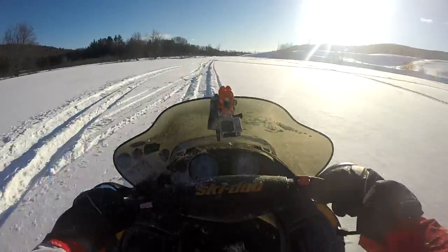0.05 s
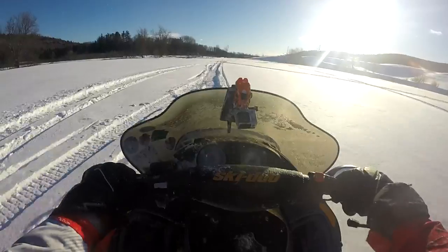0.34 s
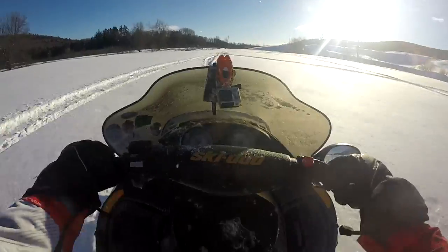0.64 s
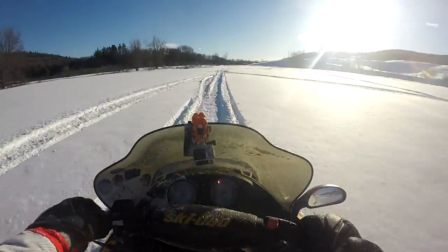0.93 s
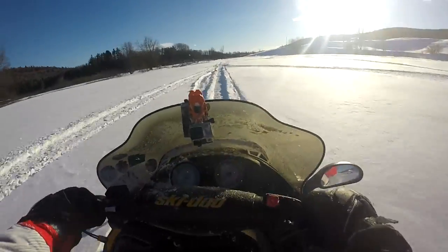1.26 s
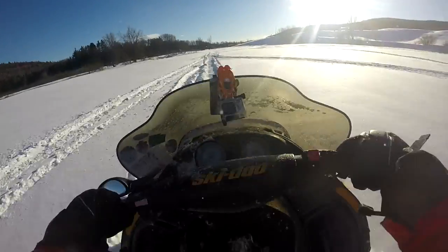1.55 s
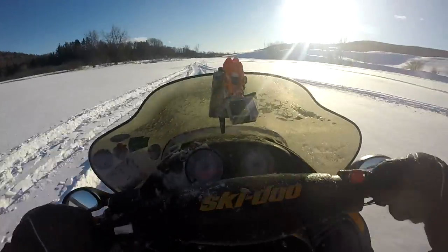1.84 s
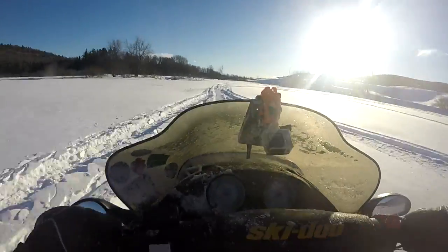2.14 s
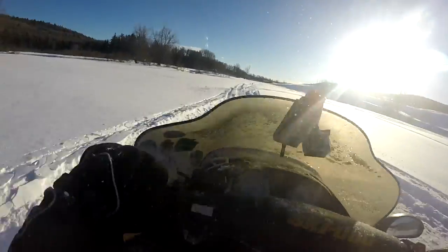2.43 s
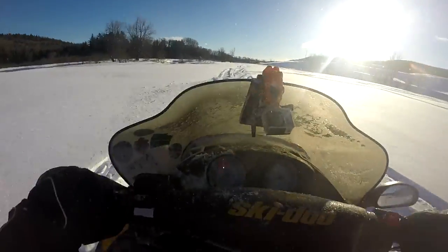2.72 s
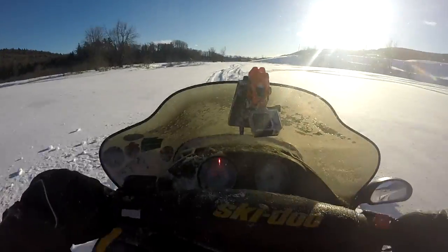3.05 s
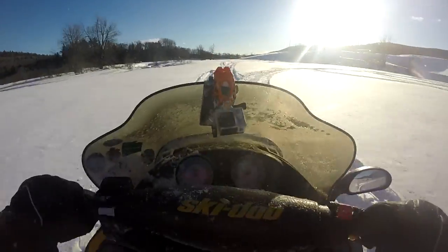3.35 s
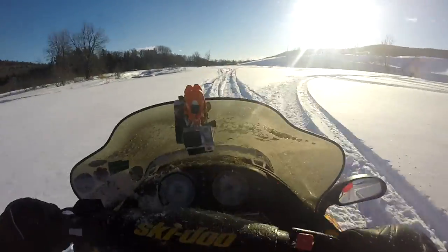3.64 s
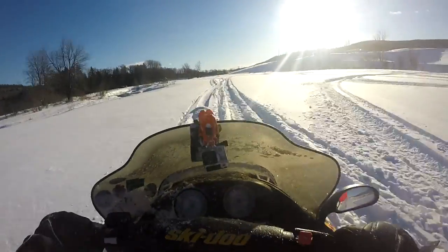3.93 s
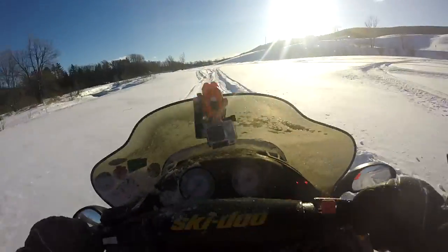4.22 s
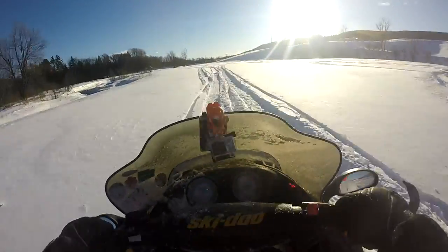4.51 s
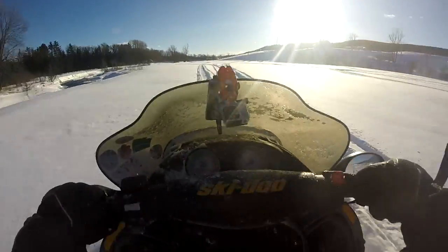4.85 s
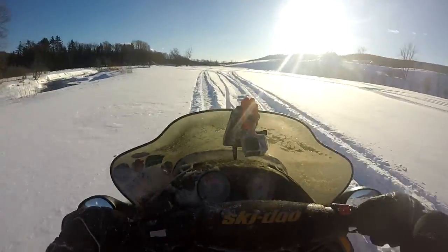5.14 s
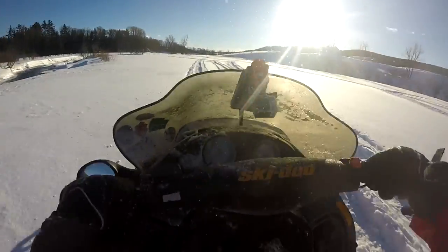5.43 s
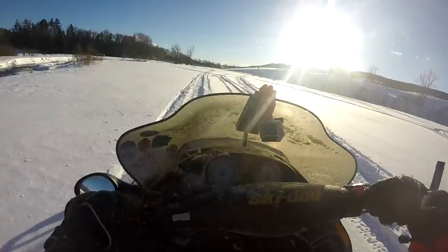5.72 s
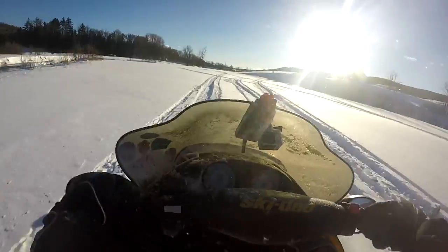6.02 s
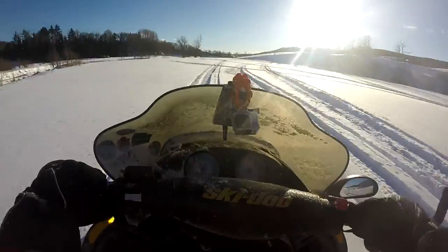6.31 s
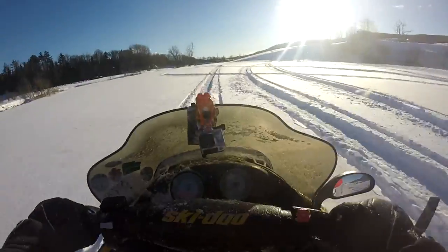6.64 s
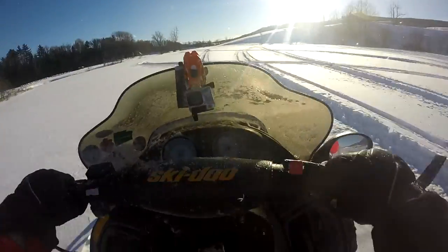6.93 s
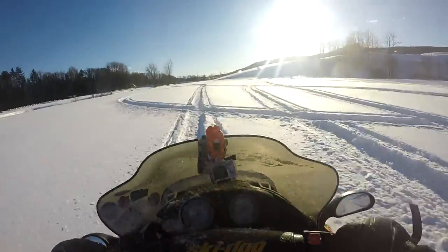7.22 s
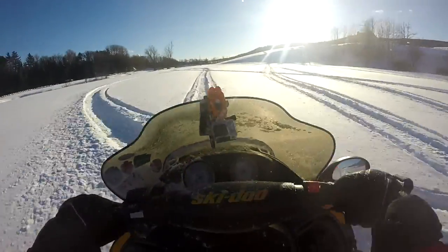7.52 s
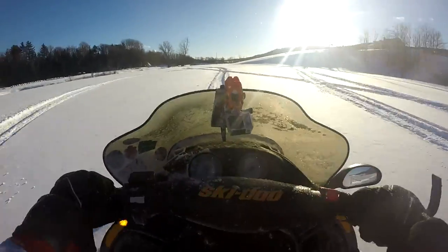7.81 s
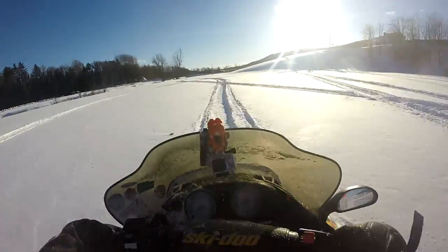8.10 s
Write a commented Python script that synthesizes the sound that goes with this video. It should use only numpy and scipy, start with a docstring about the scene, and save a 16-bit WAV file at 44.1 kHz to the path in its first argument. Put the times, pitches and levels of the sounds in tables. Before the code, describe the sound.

A two-stroke snowmobile runs at speed across open snow, heard close up from a microphone on the rider. Its loud, buzzing drone holds nearly the same pitch throughout, shifting slightly in tone. A lighter drive rattle and a grainy hiss of snow buzz along with it, and faint high whines come and go. Wind rumbles underneath, and after about two seconds short gusts begin slapping the microphone, making the drone stutter.

```python
"""Snowmobile at full speed

A two-cylinder, two-stroke snowmobile crosses open snow, heard from a camera on the rider.
Its exhaust drones at the firing rate, amid a rattling drive, hissing snow and buffeting wind.
The drone is so strong that it chokes the camera's sealed microphone once every cycle,
which chops the rattle, the hiss and the flutter of the wind into a buzz."""
import sys
import numpy as np
from scipy import signal
from scipy.fft import rfft, irfft
from scipy.io import wavfile
from scipy.ndimage import uniform_filter1d, minimum_filter1d

SR = 44100
rng = np.random.default_rng(int(sys.argv[2]) if len(sys.argv) > 2 else 0)


def store_wav(level_fs):
    """Save 16-bit WAV to argv[1]."""
    pcm = np.round(np.clip(np.atleast_2d(level_fs), -1, 1) * 32767)
    wavfile.write(sys.argv[1], SR, pcm.T.astype(np.int16))


N = 360297

# how fast the engine fires, rising and sagging as the track slips free and bites: t/s, f/Hz
FIRING_RATE = [(0.0, 206.4), (0.18, 207.5), (0.38, 205.8), (0.84, 205.6), (1.06, 207.6), (1.32, 205.7),
               (1.54, 207.4), (2.32, 206.0), (2.88, 206.8), (3.56, 204.4), (3.72, 207.7), (4.04, 205.5),
               (4.19, 207.6), (4.41, 206.3), (4.61, 207.6), (5.03, 203.5), (5.17, 207.0), (5.33, 207.2),
               (5.41, 204.6), (5.55, 203.7), (5.73, 206.2), (6.29, 205.0), (6.81, 205.6), (7.05, 204.2),
               (7.25, 207.3), (7.57, 202.4), (7.79, 205.7), (8.17, 203.9)]
# the exhaust's main tone, at the firing rate: t/s, level/dB
DRONE_LEVEL = [(0.0, -7.5), (1.34, -7.5), (1.44, -7), (3.6, -8.5), (4.33, -8), (5.17, -9.5), (5.69, -9.5),
               (5.83, -8.6), (6.69, -10), (6.89, -8), (7.55, -8.3), (7.73, -11.0), (7.95, -7.5),
               (8.17, -10)]
# the rider sways behind the windshield, so tones at 3 and 4 times the firing rate trade strength:
# t/s, third's level/dB, fourth's level/dB
SWAY_LEVELS = [(0.0, -18.5, -26), (0.64, -22.8, -19.8), (1.56, -15.5, -30.5), (1.98, -24.7, -17),
               (2.52, -29, -21), (2.62, -22, -18), (3.56, -23.5, -19), (4.09, -20.7, -24),
               (4.27, -18.5, -32), (4.41, -24, -19), (4.59, -18.5, -28.5), (4.73, -25, -20),
               (5.93, -37, -19), (6.97, -19.5, -23.5), (7.25, -19, -27.1), (7.41, -25.5, -18),
               (7.57, -19.5, -20.9), (7.79, -32.3, -20), (7.95, -25.0, -18), (8.17, -25.8, -23.5)]
# the other overtones follow them: multiple of the firing rate, level/dB relative to the main tone,
# share of the third's swell, share of the fourth's swell
OVERTONES = [(2, -10.5, 0.12, -0.0052), (5, -16, 0.21, 0.42), (6, -15.5, 0.035, 0.092),
             (7, -19, 0.049, 0.63), (8, -28.5, 0.05, 0.19), (9, -29.5, .25, -0.029), (10, -34, .01, -.05),
             (11, -33.5, .05, 0.048)]
# the cylinders differ a little, adding tones in between: multiple of the firing rate, level/dB
BETWEEN_TONES = [(.5, -41), (1.5, -38.5), (2.5, -33), (3.5, -64), (4.5, -45.5), (5.5, -43), (6.5, -43.5),
                 (7.5, -55), (8.5, -64), (9.5, -53)]
# high overtones that stand out: middle t/s, length/s, multiple of the firing rate, level/dB
WHINES = [(.55, 0.5, 11, -41.5), (1.35, 0.91, 9, -35.5), (3.02, .22, 9, -34), (3.4, 0.36, 9, -34),
          (4.1, 1.2, 9, -40.5), (5.856, 0.92, 9, -37.5), (5.82, 0.79, 17, -41.5), (6.926, 0.79, 14, -37.5),
          (7.05, 0.97, 9, -36.5)]
# the drive rattles harder for a moment: middle t/s, length/s, rise/dB
RATTLE_SURGES = [(0.603, .75, 1.5), (1.974, .2, 6.5), (2.542, 0.17, 8), (3.38, .35, 1.5), (5.85, 0.99, 3),
                 (6.95, .7, 3)]
# snow thrown up by track and skis: t/s, level/dB
SPRAY_LEVEL = [(0.0, -30.5), (1.58, -30), (2.34, -27), (2.7, -28), (3.48, -27), (3.64, -29.5),
               (4.41, -27.5), (4.49, -29.5), (6.29, -30), (6.67, -32), (7.31, -29.5), (8.17, -31.5)]
# the track is pressed onto its rails, then eases off: t/s, relative level/dB, time to ease/s
TRACK_PRESSES = [(2.3, -37.5, 0.83), (3.05, -38, .3), (3.66, -40, 0.27), (4.06, -37, 0.43), (4.63, -34, .3),
                 (7.25, -30, 1.1)]
# air rushing past the camera: t/s, relative level/dB
WIND_LEVEL = [(0.0, -26.5), (0.78, -24), (1.0, -28.5), (1.14, -23.5), (1.76, -21.8), (2.14, -21),
              (2.96, -24), (3.12, -15.5), (3.42, -21.5), (3.52, -16.5), (4.47, -21.5), (4.81, -17),
              (5.45, -23), (6.45, -11), (6.81, -29), (6.89, -21), (7.79, -18), (8.17, -19.0)]
# the loudest gusts that slap the camera: t/s, relative level/dB
GUSTS = [(2.24, -20), (2.477, -21), (2.725, -11), (3.015, -16), (3.125, -9), (3.535, -15), (4.025, -13),
         (4.855, -9), (4.975, -13), (5.115, -20), (5.365, -11), (5.65, -15), (5.88, -8), (6.129, -6),
         (6.2, -7), (6.385, -18), (6.475, -12), (6.638, -12)]

# tone colours, or how strong each sound is from low to high: f/Hz, relative level/dB
RATTLE_COLOUR = [(2000, -6), (2500, -2.5), (3000, 2.5), (3550, 1), (4100, -10), (5000, 0.5), (5900, 0.5),
                 (7000, -7), (8300, -4.5), (10000, -27.5)]  # engine and clutch
SNOW_COLOUR = [(600, 0), (1500, 1.5), (2500, -7), (4000, -5.5), (4900, -2.5), (5900, -2), (6500, -2.5),
               (7200, -5.5), (8200, -5.5), (9300, -12), (10400, -20), (11500, -25), (12800, -32.5),
               (15500, -36)]  # flying snow
RAIL_COLOUR = [(3500, -32.5), (4500, -2.5), (4800, 3), (5150, 9.5), (5450, -16), (6500, -38.5)]  # ringing rails
SCRAPE_COLOUR = [(1200, -9), (2500, -4), (3300, 3), (4100, -6), (6000, -5), (9000, -9), (14000, -37)]  # scraping skis
RUMBLE_COLOUR = [(15, -22), (40, -1), (70, 3.5), (140, -2), (220, -1), (400, -10.5), (900, -61),
                 (5000, -86)]  # deep wind
FLUTTER_COLOUR = [(60, -8.5), (160, 6.5), (260, 3), (400, -2), (600, -1.5), (900, -6), (1300, -18.5),
                  (2000, -21), (3500, -21), (8000, -63), (13000, -82.5)]  # small swirls of air
GUST_COLOUR = [(40, 1), (150, -3), (350, -4), (700, -12), (1200, -14.5), (2200, -26), (4000, -33),
               (8000, -48), (13000, -77)]  # large swirls of air


def firing_phase(start_rad=2.33, jitter_rad=0.0085):
    """The engine's cycle as an angle, one turn per firing; each firing comes a bit early or late."""
    firing_hz, = curves(FIRING_RATE)
    return start_rad + 2 * np.pi * np.cumsum(firing_hz) / SR + jitter_rad * wander(200)


def exhaust(phase, lag_rad=0.091, echo_rad=0.77, sway_rad=0.49):
    """The ports snap open and shut, making odd overtones; the tuned pipe's echo adds the even ones."""
    drone_db, = curves(DRONE_LEVEL)
    third_db, fourth_db = curves(SWAY_LEVELS)
    levels = [(3, third_db), (4, fourth_db)]
    for multiple, db, third_share, fourth_share in OVERTONES:
        sway_db = third_share * swell(third_db) + fourth_share * swell(fourth_db)
        levels.append((round(multiple), drone_db + db + sway_db + 1.23 * wander(5)))
    overtones = between = 0
    for multiple, db in levels:
        shift = 0
        if multiple > 2:
            shift = sway_rad * wander(2)  # the waves drift as the rider moves
            if multiple % 2 == 0:
                shift += echo_rad  # the echo delays the even ones
        overtones += undb(db) * np.sin(multiple * (phase - lag_rad) - shift)
    for multiple, db in BETWEEN_TONES:
        between += undb(db + 2 * wander(9)) * np.sin(multiple * phase + rng.uniform(0, 2 * np.pi))
    burn_db = wander(200)  # no two firings burn alike
    main_tone = undb(drone_db + 0.5 * burn_db) * np.sin(phase)
    throb = undb(0.5 * wander(16))  # the whole drone wavers with the bumps of the ride
    return np.sqrt(2) * throb * (main_tone + undb(burn_db) * overtones + between)


def whines(phase, lag_rad=0.1):
    """Now and then a high engine overtone swells out of the rattle and sinks back."""
    sound = 0
    for middle, length, multiple, db in WHINES:
        loudness = undb(db) * np.sqrt(2 * arch(middle, length))
        sound += loudness * np.sin(multiple * (phase - lag_rad))
    return sound


def drive_rattle(phase, load_db, level_db=-33.5, surge_hz=3000, surge_width_hz=900):
    """Engine and clutch rattle on every firing, louder under load; the tones slowly trade strength."""
    surge = sum((undb(db) - 1) * arch(middle, length) for middle, length, db in RATTLE_SURGES)
    sound = power = 0
    for multiple in range(12, 44):
        hz = multiple * FIRING_RATE[0][1]
        gain = gain_at(hz, RATTLE_COLOUR)
        tone = wander(3.5) * np.cos(multiple * phase) + wander(3.5) * np.sin(multiple * phase)
        lift = 1 + surge * bell(hz - surge_hz, surge_width_hz)  # surges lift the lower tones
        sound += gain * tone * lift
        power += gain ** 2
    uneven = 1 + 0.38 * np.cos(phase / 2)  # one cylinder rattles harder than the other
    return undb(level_db + load_db) * uneven * sound / np.sqrt(power)


def snow_hiss(spray_db, patch_db=0.96, grain_db=1.83):
    """Track and skis throw up a grainy hiss of snow, a little different from patch to patch."""
    return undb(spray_db + patch_db * wander(12) + grain_db * wander(130)) * noise(SNOW_COLOUR)


def rails_and_skis(rest_db=-47, attack_s=0.068, scrape_lag_s=0.098, scrape_width_s=0.05):
    """At each press the skis scrape briefly, and the rails ring near 5 kHz until the track eases off."""
    t = np.arange(N) / SR
    pressure = scraping = 0
    for when, db, ease_s in TRACK_PRESSES:
        strength = undb(db - 1)
        pressure += strength * spike(when, attack_s, ease_s)
        scraping += strength * bell(t - when - scrape_lag_s, scrape_width_s)
    ringing = np.hypot(undb(rest_db), pressure)  # the rails never fall quite silent
    return ringing * noise(RAIL_COLOUR) + scraping * noise(SCRAPE_COLOUR)


def wind(rumble_trim_db=-4, flutter_db=-24, puff_db=1.5):
    """Air rushing past the camera makes a low rumble and a quick flutter; both puff together."""
    wind_db, = curves(WIND_LEVEL)
    wind_db += puff_db * wander(11)
    rumble = undb(wind_db + rumble_trim_db + 1.5 * wander(40)) * noise(RUMBLE_COLOUR)
    flutter = undb(flutter_db + 0.66 * swell(wind_db) + 3 * wander(90)) * noise(FLUTTER_COLOUR)
    return rumble, flutter


def gusts(attack_s=0.0054, release_s=0.016):
    """Larger swirls of air come off the windshield and hit as short slaps."""
    slaps = sum(undb(db + 0.5) * spike(when, attack_s, release_s) for when, db in GUSTS)
    return slaps * noise(GUST_COLOUR)


def microphone_seal(phase, leak=0.26, threshold=0.35, steepness=5):
    """The seal stiffens at each pressure peak of the drone, letting sound in mainly between peaks."""
    pressure = np.sin(phase + 0.33)
    slack = (1 + np.tanh(steepness * (threshold - pressure))) / 2
    return unit(leak + (1 - leak) * slack)


def undb(db):
    """Turn decibels into a gain to multiply by."""
    return 10 ** (np.asarray(db) / 20)


def unit(x):
    """Scale a signal so that its typical size (rms) is 1."""
    return x / np.sqrt(np.mean(x ** 2))


def curves(table):
    """Join a timed table's points with straight lines, one value per sample."""
    times, *columns = np.transpose(table)
    return [np.interp(np.arange(N) / SR, times, column) for column in columns]


def gain_at(hz, colour):
    """How strong a tone colour is at the given frequencies."""
    points_hz, db = np.transpose(colour)
    return undb(np.interp(np.log(np.maximum(hz, 1)), np.log(points_hz), db))


def noise(colour):
    """Noise with the given tone colour and a typical size of 1."""
    hz = np.arange(N // 2 + 1) * SR / N
    white = rfft(rng.standard_normal(N))
    return unit(irfft(white * gain_at(hz, colour), N))


def wander(rate):
    """A smooth random wobble of typical size 1 that changes about `rate` times a second."""
    hold = int(SR / rate)
    steps = rng.standard_normal(8192)
    return unit(uniform_filter1d(steps[np.arange(N) // hold], hold))


def swell(db):
    """How far a level stands above its average."""
    return db - db.mean()


def arch(middle_s, length_s):
    """A rounded rise and fall, 1 at its top."""
    return np.maximum(1 - (2 * (np.arange(N) / SR - middle_s) / length_s) ** 2, 0)


def bell(offset, width):
    """A bell-shaped bump, 1 where the offset is zero."""
    return np.exp(-(offset / width) ** 2 / 2)


def spike(peak_s, attack_s, release_s):
    """A rise to a sharp peak of 1, then a fade."""
    age = np.arange(N) / SR - peak_s
    return np.exp(-np.maximum(-age / attack_s, age / release_s))


def scene(buffet=1.01):
    """The drone, its whines and the wind rumble, plus everything that the drone chops."""
    phase = firing_phase()
    spray_db, = curves(SPRAY_LEVEL)
    load_db = swell(spray_db)  # the more snow the track throws, the harder the drive works
    rumble, flutter = wind()
    ride = drive_rattle(phase, load_db) + rails_and_skis() + snow_hiss(spray_db)
    chopped = microphone_seal(phase) * (ride + flutter + gusts())
    drone = exhaust(phase) * (1 - buffet * rumble)  # wind presses on the seal, so the drone stutters
    return (drone + whines(phase) + rumble + chopped)[None]


def record(dry, window_samples=160, top_hz=15300):
    """A fast limiter turns down the loudest peaks; the camera cuts off the highest treble."""
    gain = 1 / np.maximum(np.abs(dry), 1)
    held_gain = minimum_filter1d(gain, window_samples)
    smooth_gain = uniform_filter1d(held_gain, window_samples)
    treble_cut = signal.ellip(8, 0.2, 70, top_hz, fs=SR, output="sos")
    return signal.sosfilt(treble_cut, dry * smooth_gain)


dry = scene()
out = record(dry)
store_wav(out)
```